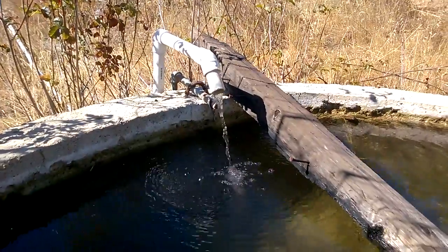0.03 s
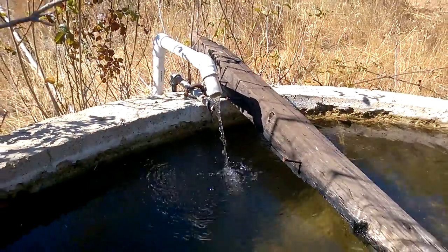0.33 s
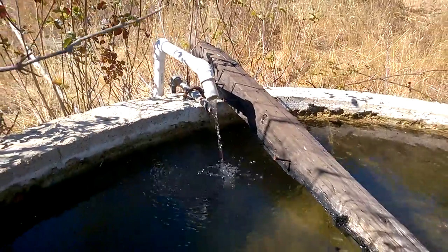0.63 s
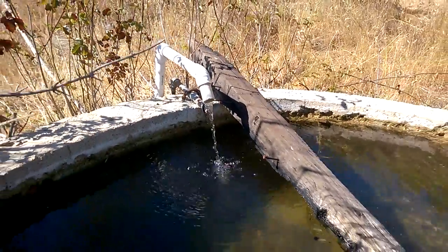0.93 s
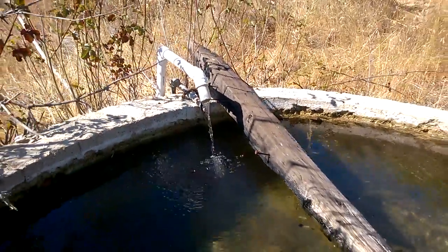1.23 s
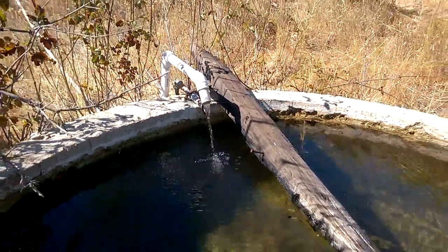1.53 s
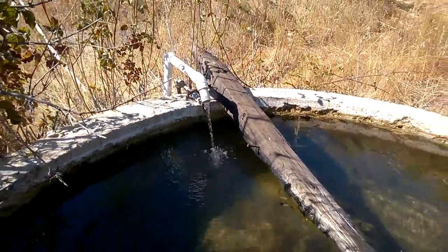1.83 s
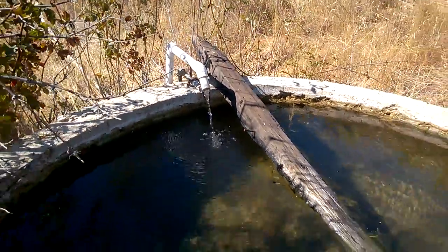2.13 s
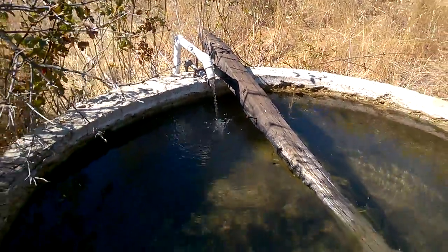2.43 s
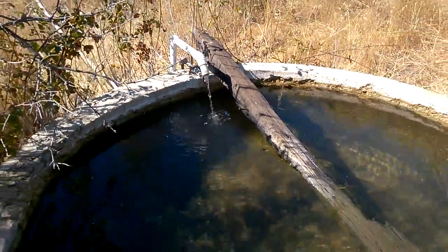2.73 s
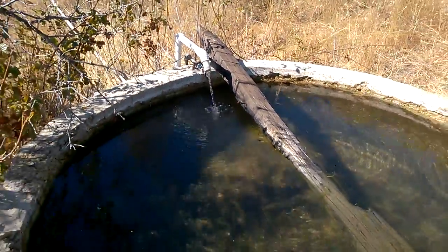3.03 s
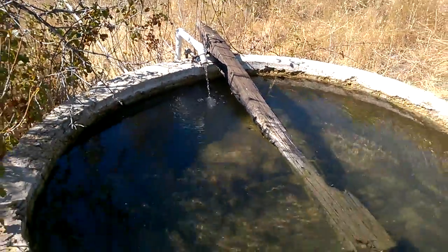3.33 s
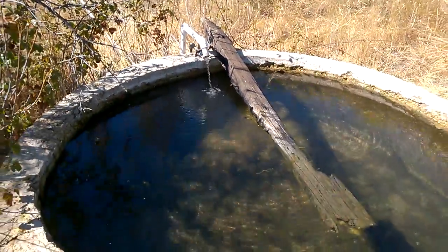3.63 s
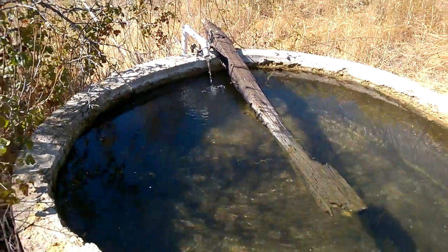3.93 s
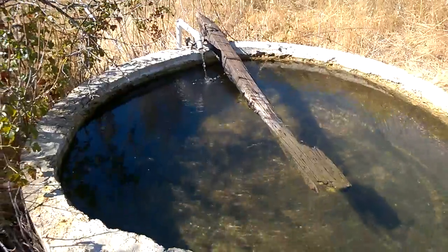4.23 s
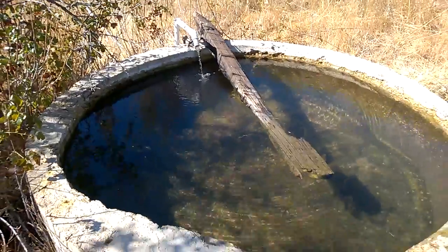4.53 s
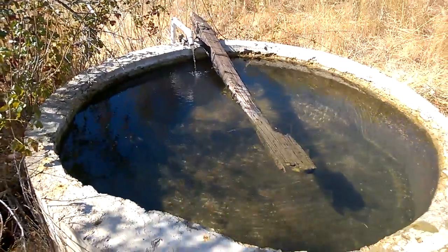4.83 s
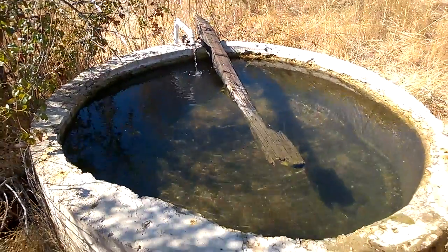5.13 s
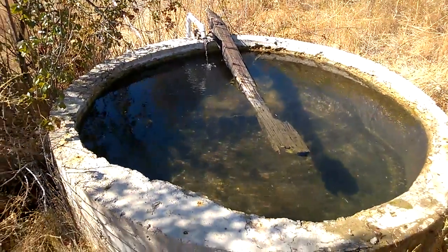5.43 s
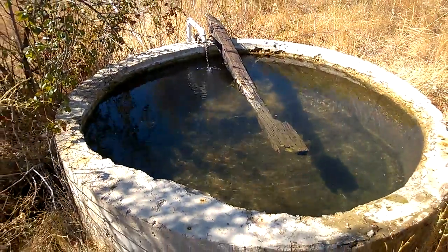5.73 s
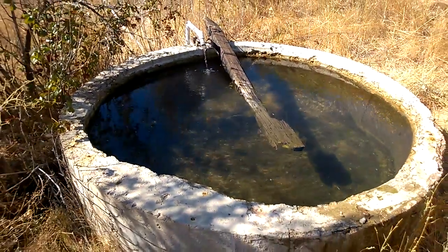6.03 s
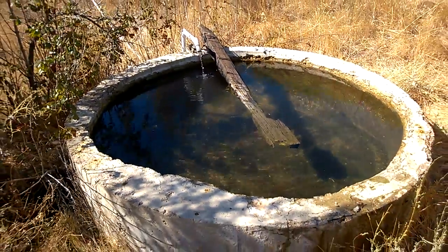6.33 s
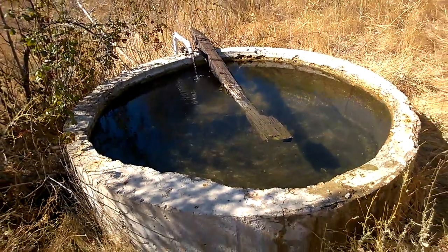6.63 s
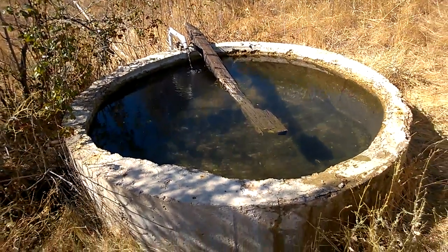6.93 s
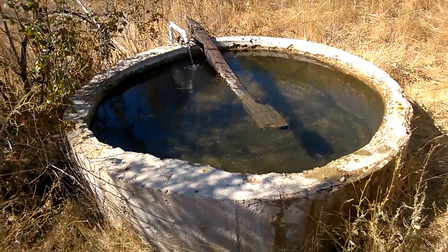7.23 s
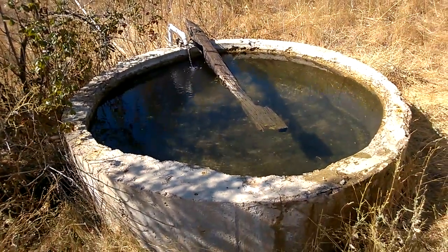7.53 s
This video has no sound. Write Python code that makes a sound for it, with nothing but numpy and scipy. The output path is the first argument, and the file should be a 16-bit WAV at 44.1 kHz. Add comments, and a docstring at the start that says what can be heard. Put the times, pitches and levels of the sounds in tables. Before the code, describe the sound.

Water trickles and plops into a stone trough, then gives way to wind rumble, crunching dry brush and snapping twigs.

```python
"""Water trough and dry brush

A thin stream falls from a pipe into a full stone trough: drops open ringing cavities (plops),
small bubbles pip and larger ones glug upward. The listener backs away through dry brush,
where stalks catch and slip, crunching and hissing, and twigs snap close by.
Gusts buffet the microphone and the hand bumps it a few times."""
import sys
import numpy as np
from scipy import signal
from scipy.fft import rfft, irfft
from scipy.io import wavfile
from scipy.ndimage import uniform_filter1d

SR = 44100
rng = np.random.default_rng(int(sys.argv[2]) if len(sys.argv) > 2 else 0)


def wav_out(sig):
    """Save sig, one row per channel (or a flat mono array), as 16-bit PCM at SR to the path in sys.argv[1]."""
    wavfile.write(sys.argv[1], SR, np.round(np.clip(np.atleast_2d(sig).T, -1, 1) * 32767).astype(np.int16))


N = 334278
T = np.arange(N) / SR


def undb(db):
    return 10 ** (np.asarray(db) / 20)


def unit(x):
    """Scale to rms 1."""
    return x / np.sqrt(np.mean(x ** 2))


def peak(x, db):
    """Scale to a peak level."""
    return x * undb(db) / np.abs(x).max()


def curves(table):
    """Each column of a table as an automation curve over time."""
    s, *columns = np.transpose(table)
    return [np.interp(T, s, c) for c in columns]


def add(out, s, sound):
    """Mix a short sound in at time s."""
    i = int(np.clip(s * SR, 0, N - 1))
    out[i:i + len(sound)] += sound[:N - i]


def colour(x, points):
    """Minimum-phase EQ through points of f/Hz, level/dB."""
    hz, db = np.transpose(points)
    size = 8192
    f = np.maximum(np.arange(size // 2 + 1) * SR / size, 1)
    gain = undb(np.interp(np.log(f), np.log(hz), db))
    cepstrum = irfft(np.log(gain))
    cepstrum[1:size // 2] *= 2
    cepstrum[size // 2 + 1:] = 0
    return signal.fftconvolve(x, irfft(np.exp(rfft(cepstrum))))[:len(x)]


def walk(rate):
    """Random drift with a spread near 1, turning rate times a second."""
    return np.interp(T * rate, np.arange(4096), rng.standard_normal(4096))


def crackle(per_s, spread_db):
    """Random clicks, a few much larger than the rest; rms 1."""
    size = undb(spread_db * np.minimum(rng.exponential(size=N), 4))
    return unit((rng.random(N) < per_s / SR) * size * rng.choice([-1, 1], N))


def noise_burst(t60, samples=SR // 10):
    """White noise with an instant attack, falling 60 dB in t60 seconds."""
    return rng.standard_normal(samples) * np.exp(-np.log(1000) * T[:samples] / t60)


def ring(hz, t60, glide=0, attack=0.00036):
    """A dying sine whose pitch moves by the share glide while it lasts."""
    t = T[:int(t60 * SR) + 2]
    phase = 2 * np.pi * hz * t * (1 + glide * t / t60 / 2)
    return np.sin(phase) * np.exp(-np.log(1000) * t / t60) * (1 - np.exp(-t / attack))


def strike(modes, detune):
    """One hit on modes of f/Hz, level/dB, t60/s, each a little off pitch."""
    out = np.zeros(SR // 4)
    for hz, db, t60 in modes:
        tone = undb(db) * ring(hz * (1 + detune * rng.standard_normal()), t60)[:len(out)]
        out[:len(tone)] += tone
    return out


def patter(per_s, spread_db, cycles, low_hz, high_hz, count):
    """A cloud of brief grains on count pitches, the higher ones stronger for a roughly flat spectrum."""
    out = np.zeros(N)
    for hz in np.geomspace(low_hz, high_hz, count):
        grain = ring(hz, t60=cycles / hz, glide=0.04, attack=0.15 / hz)
        surge = undb(3.55 * walk(18))  # each pitch comes and goes, so the colour keeps shifting
        grains = signal.oaconvolve(crackle(per_s / count, spread_db), grain)[:N]
        out += np.sqrt(hz) * surge * unit(grains)
    return unit(out)


def tail(x, t60, eq):
    """A short scatter of echoes, wet only."""
    echoes = noise_burst(t60, SR // 6) * (T[:SR // 6] > .0015)
    return signal.fftconvolve(x, colour(echoes / np.linalg.norm(echoes), eq))[:N]


# EQ of the ambience bed: f/Hz, level/dB
AIR_EQ = [(12, -43), (20, -4), (60, -16.5), (161, 9), (398, 2), (499, -22), (1040, 5.5), (1590, -12),
          (2110, -5), (2640, -8), (17000, -26)]


def air():
    """The quiet of open country, gently wavering."""
    return unit(colour(rng.standard_normal(N), AIR_EQ)) * undb(-66 + 4.2 * walk(2.84))


# EQ of the babble: f/Hz, level/dB
WATER_EQ = [(180, -56), (300, 2), (425, 5), (528, -11), (593, -12), (994, -9.5), (1080, -14), (1230, -12.5),
            (1690, -21), (2100, -7), (2650, -20.5), (4440, -15), (8220, -28), (10200, -30), (16000, -73)]
# fader ride on the babble and faint drops as the listener backs away: t/s, level/dB
DISTANCE_FADE = [(0, 0), (1.2, -0.5), (1.6, -0.5), (2.4, -2.5), (3.5, -2.5), (5, -0.5), (6, -6),
                 (7.58, -7.5)]
# fader ride on the soft plops, which the rim hides from afar: t/s, level/dB
RIM_SHADE = [(2.5, 12), (5, -11), (7.58, -12)]


def babble():
    """The bed of the pour: countless small bubbles, fine splashes and soft plops."""
    bubbles, soft_plops = np.zeros(N), np.zeros(N)
    for when, pitch, size, life, rise in rng.random((2400, 5)):
        hz = 520 * 13 ** (pitch ** .7)  # small ones outnumber large ones
        bubble = ring(hz, t60=(18 + 36 * life) / hz, glide=0.5 * rise, attack=0.00072)
        add(bubbles, when * N / SR, undb(-14 * size) * bubble)
    for k, (when, size) in enumerate(rng.random((68, 2))):
        add(soft_plops, (k + when) / 9, plop(-44 - 6 * size))  # about nine a second
    splash = patter(per_s=2200, spread_db=3.5, cycles=14, low_hz=600, high_hz=13000, count=16)
    splash *= undb(7.9 * walk(40))
    water = undb(-51.5) * unit(colour(bubbles, WATER_EQ)) + undb(-56) * unit(colour(splash, WATER_EQ))
    water += soft_plops * undb(curves(RIM_SHADE)[0])
    return water * undb(curves(DISTANCE_FADE)[0])


def spurts(rise_s=.003, fall_s=0.026, spurt_db=-1, lull_db=-5):
    """Gain of the babble: splashing gathers behind each big drop and sinks to a lull between them."""
    burst = np.zeros(N)
    for s, *_ in PLOPS + PIPS + SPRAY:
        near = np.abs(T - s) < .2
        age = T[near] - s
        width = np.where(age < 0, rise_s, fall_s)
        burst[near] = np.maximum(burst[near], np.exp(-(age / width) ** 2))
    return undb(lull_db + (spurt_db - lull_db) * burst)


def sprinkle(sound, db, hz, scatter, count, range_db=10.5):
    """Faint drops at loosely even moments, scattered in pitch and size, fading with distance."""
    out = np.zeros(N)
    for k, (when, size, pitch) in enumerate(rng.random((count, 3))):
        drop_hz = hz * np.exp(2 * scatter * (2 * pitch - 1))
        add(out, (k + when) / count * N / SR, sound(db - range_db * size, drop_hz))
    return out * undb(curves(DISTANCE_FADE)[0])


def play(cues, sound):
    """Trigger a sound at the time of each cue, with the rest of the row as its settings."""
    out = np.zeros(N)
    for s, *settings in cues:
        add(out, s, sound(*settings))
    return out


# foreground small bubbles: t/s, peak level/dB, f/Hz
PIPS = [(0.017, -40.5, 2240), (0.073, -38, 2270), (0.085, -36, 2020), (0.114, -40, 2100),
        (0.19, -40.5, 2330), (0.428, -38, 2030), (0.656, -37, 1990), (0.704, -41, 2190),
        (0.853, -36.5, 1520), (0.918, -35.5, 2000), (0.942, -35, 2070), (1.072, -37.5, 2160),
        (1.104, -32.5, 2090), (1.191, -32, 2120), (1.234, -41.5, 2080), (1.472, -39.5, 2020),
        (6.146, -35, 2030), (6.377, -35, 1930), (6.45, -43, 1760), (6.73, -44, 2050), (6.798, -45, 2300),
        (6.903, -42.5, 1990), (7.247, -40.5, 1940), (7.488, -47, 1870)]


def pip(db, hz):
    """A small bubble rings and rises a little."""
    return peak(ring(hz, t60=0.016, glide=0.013, attack=0.00053), db)


# rising bubbles: t/s, level/dB, start f/Hz, end f/Hz, length/s
GLUGS = [(0.024, -49, 610, 1150, 0.026), (0.202, -50, 1080, 1390, 0.022), (0.353, -46, 940, 1050, 0.017),
         (0.426, -47, 1090, 1470, 0.013), (0.758, -47, 520, 1030, 0.043), (0.863, -38, 804, 1570, 0.014),
         (0.91, -35, 570, 1460, 0.0103), (0.987, -47, 870, 1480, 0.057), (1.141, -44, 717, 1040, 0.033),
         (1.278, -48, 836, 1040, 0.026), (2.33, -48, 720, 850, .05), (2.541, -50, 774, 940, .04)]


def glug(db, start_hz, end_hz, length):
    """A bubble whose pitch climbs, wobbling, as it nears the surface."""
    age = np.linspace(0, 1, int(length * SR))
    wobble = np.interp(age, np.linspace(0, 1, 7), rng.standard_normal(7))
    hz = start_hz * (end_hz / start_hz) ** age * (1 + .04 * wobble)
    envelope = np.sqrt(np.abs(np.sin(np.pi * age))) * undb(db + 3 * wobble[::-1])
    return np.sin(2 * np.pi * np.cumsum(hz) / SR) * envelope


# foreground drops: t/s, level/dB
PLOPS = [(0.026, -34.5), (0.157, -35.5), (0.213, -36.5), (0.235, -34), (0.25, -28), (0.304, -40),
         (0.321, -44), (0.41, -33.5), (0.534, -36), (0.583, -31.5), (0.598, -37.5), (0.672, -48),
         (0.8, -47), (0.886, -30), (0.922, -35), (0.956, -38.5), (1.087, -34), (1.258, -42), (1.415, -38),
         (1.614, -44.5), (1.719, -44), (1.822, -40), (1.926, -42), (2.079, -36.5), (2.112, -36.5),
         (2.217, -43), (2.468, -41)]
# modes of the cavity a drop opens: f/Hz, level/dB, t60/s
CAVITY_MODES = [(421.7, -4, 0.12), (648, -9, 0.073), (796, -4, 0.033), (1270, -0.5, 0.014),
                (2140, -6, 0.013)]


def plop(db):
    """A drop opens a ringing cavity and drags a flurry of small bubbles under."""
    modes = []
    for hz, level, t60 in CAVITY_MODES:
        stray = .06 * (hz > 500) * rng.standard_normal()  # the upper modes vary most
        modes.append((hz * (1 + stray), level + 2.2 * rng.standard_normal(), t60))
    out = peak(strike(modes, detune=.025), 0)
    for late, pitch, size in rng.random((8, 3)):
        hz = 1100 * 5.5 ** pitch
        bubble = ring(hz, t60=28 / hz, glide=0.17, attack=0.00065)
        add(out, .04 * late, undb(-8.5 - 28 * size - 7 * pitch) * bubble)
    return out * undb(db)


# foreground droplets: t/s, level/dB, f/Hz
SPRAY = [(0.246, -43, 3130), (0.306, -41, 5520), (0.409, -47, 3040), (0.499, -38.5, 3540),
         (0.924, -44, 3250), (1.073, -47, 3770), (1.247, -41.5, 3760), (1.615, -44.5, 4140),
         (1.658, -44.5, 4470), (2.149, -42, 4300), (2.295, -44, 4320), (2.493, -43.5, 4100),
         (2.665, -34.5, 4840), (3.455, -38, 4540), (6.269, -49.5, 3900), (6.463, -47, 3430),
         (7.22, -37.5, 4000), (7.323, -49.5, 4670)]


def droplet(db, hz):
    """A droplet of spray splats, then leaves a tiny bubble."""
    splat = rng.standard_normal(SR // 25) * np.exp(-T[:SR // 25] / 0.0039)
    splat_eq = [(1500, -17.5), (3500, 1.5), (6000, -6.5), (8000, -14.5), (11000, -16), (16000, -23.5)]
    out = peak(colour(splat, splat_eq), db=1)
    add(out, 0.001, peak(ring(hz, t60=0.01, glide=0.11, attack=0.00045), 0))
    return out * undb(db)


def stream():
    """The falling water: foreground drops over spurting babble, faint pips and faint spray."""
    faint_pips = sprinkle(pip, db=-46.5, hz=2170, scatter=0.06, count=60)
    faint_spray = sprinkle(droplet, db=-44.5, hz=4035, scatter=0.215, count=130)
    drops = play(PLOPS, plop) + play(PIPS, pip) + play(GLUGS, glug) + play(SPRAY, droplet)
    return drops + babble() * spurts() + faint_pips + faint_spray


def trough(water):
    """The stone rim throws back short echoes, and a hollow note hums along under the pour."""
    hollow = signal.fftconvolve(water, ring(hz=425.3, t60=0.14))[:N]
    hollow *= np.std(water) / np.std(hollow)
    echoes = tail(water, t60=0.046, eq=[(400, -9), (1000, -3), (2500, -5.5), (10000, -7)])
    return water + undb(-0.5) * echoes + undb(-14) * hollow


# gusts on the microphone: t/s, hold/s, level/dB
GUSTS = [(0.205, 0.037, -52), (0.44, .015, -54), (1.452, .015, -54), (2.27, 0.022, -54),
         (2.475, 0.085, -32), (2.599, 0.052, -28), (2.66, .18, -36.5), (2.893, 0.037, -22.5),
         (2.962, 0.091, -19), (3.097, 0.013, -28.5), (3.166, 0.015, -14.5), (3.191, 0.032, -25),
         (3.298, 0.0075, -22.5), (3.358, 0.013, -32.5), (3.452, 0.24, -50.5), (3.713, 0.029, -41),
         (3.794, .025, -44), (4.365, 0.043, -43.5), (4.443, 0.09, -53.5), (4.685, 0.022, -50),
         (4.914, 0.19, -50), (5.542, 0.088, -54.5), (6.947, .02, -37.5), (7.049, 0.091, -43.5),
         (7.173, 0.024, -36), (7.223, 0.051, -32), (7.285, .16, -48), (7.465, 0.036, -43),
         (7.533, 0.058, -37)]


def gusting(attack_db_per_s=900, release_db_per_s=523):
    """Wind strength in dB: each gust leaps up, holds and drops back into the breeze."""
    db = -66.5 + 5.5 * walk(14)  # the breeze
    for s, hold, top_db in GUSTS:
        below = np.maximum(attack_db_per_s * (s - T), release_db_per_s * (T - s - hold))
        db = np.maximum(db, top_db - np.maximum(below, 0))
    return db


# EQ of the eddies, ahead of their levelling: f/Hz, level/dB
EDDY_EQ = [(11, -63), (18, 13.5), (59, 0), (118, -10.5), (188, -22), (220, -28.5), (254, -17), (365, -29.5),
           (400, -34), (520, -73), (880, -120)]


def wind():
    """Eddies on the microphone; the harder the gust, the higher its rumble reaches."""
    gust_db = gusting()
    eddies = colour(rng.standard_normal(N), EDDY_EQ)
    eddies /= np.sqrt(uniform_filter1d(eddies ** 2, SR // 18))  # levelled: the gusts set the dynamics
    rumble = unit(colour(eddies, [(25, -14), (50, 1.5), (85, 3), (120, -2), (250, -8)]))
    puffs = crackle(per_s=400, spread_db=3)
    flutter_eq = [(70, -17), (130, 14.5), (200, -3.5), (300, -14.5), (450, -19), (1000, -60)]
    flutter = unit(colour(puffs, flutter_eq))
    return rumble * undb(gust_db) + flutter * undb(-36.5 + 2 * (gust_db + 25))


# tiny bright clicks, from splatting drops at first and dry stems later: t/s, peak level/dB
TICKS = [(0.2492, -41), (0.308, -39), (0.9223, -37), (2.6303, -25), (3.1735, -20.5), (3.4284, -27),
         (4.402, -20), (4.446, -27), (4.6922, -47), (4.853, -26), (4.88, -23), (5.013, -26.5),
         (5.1668, -29), (5.249, -28), (5.8176, -13.5), (6.2024, -43)]


def tick(db):
    """A tiny, bright click: a drop splats or a dry stem gives."""
    tick_eq = [(3000, -6.5), (6000, -7), (8000, 3), (12000, 9), (14000, -8), (17000, -36)]
    return peak(colour(noise_burst(t60=0.0021), tick_eq), db)


# handling bumps: t/s, peak level/dB, f/Hz, t60/s
BUMPS = [(0.448, -18.5, 260, 0.0074), (3.747, -33, 485, 0.077), (5.551, -36, 210, 0.012),
         (6.321, -36.5, 352, 0.021), (6.37, -27, 349, 0.026), (6.546, -24.5, 353, 0.024),
         (6.689, -31, 327, 0.022)]


def bump(db, hz, t60):
    """The hand knocks softly on the housing: a dull note that sags in pitch."""
    return peak(ring(hz, t60, glide=-0.36, attack=0.0015), db)


# light rustle of the moving listener: t/s, crunch/dB, scrape/dB, hiss/dB
RUSTLE = [(1.8, -69, -77, -97), (2.45, -56.5, -55, -77), (2.85, -58, -56.5, -50.5),
          (3.5, -46.5, -56.5, -65), (4.3, -69, -59.5, -59), (4.8, -64, -62.5, -67),
          (5.6, -56.5, -58, -58.5), (6, -59.5, -59.5, -73), (6.8, -66.5, -61.5, -91),
          (7.1, -83, -64.5, -88), (7.58, -74, -70, -77)]
# pushes through the brush: crest t/s, length/s, crunch/dB, scrape/dB, hiss/dB, swish/dB
PUSHES = [(1.98, 0.14, -53.5, -60, -71.5, -75.5), (2.279, 0.046, -50.5, -55, -63.5, -70),
          (2.356, .13, -55, -56, -71, -85), (2.536, 0.033, -55, -68, -57, -60),
          (2.62, 0.055, -46.5, -50, -50.5, -59), (2.708, 0.077, -46, -68, -65, -80),
          (2.858, 0.15, -45, -50, -67, -78), (2.968, 0.19, -59, -49.5, -50, -80),
          (3.116, 0.12, -50, -47.5, -44.5, -56), (3.28, 0.21, -46, -50.5, -47.5, -84),
          (3.435, 0.065, -65, -52, -45, -59), (3.574, 0.058, -53, -44, -42, -42),
          (3.655, 0.2, -44, -50.5, -48, -51), (3.871, 0.084, -46, -44.5, -43.5, -45),
          (3.944, 0.088, -51, -50, -45.5, -54), (4.077, 0.076, -48, -43, -43.5, -53),
          (4.157, 0.11, -46.5, -55.5, -52.5, -70), (4.41, 0.2, -43.5, -50, -48.5, -60),
          (4.512, 0.13, -48.5, -50.5, -42.5, -42.5), (4.696, 0.081, -41, -50, -50.5, -60),
          (4.899, 0.1, -43, -45.5, -44, -43.5), (4.973, 0.083, -42, -59, -46.5, -66),
          (5.166, .1, -44.5, -55.5, -50.5, -70), (5.317, .1, -46.5, -40.5, -40, -44),
          (5.43, 0.088, -46.5, -49.5, -49, -71), (5.789, 0.092, -47.5, -46.5, -48, -54),
          (5.883, 0.079, -76, -58, -59, -79), (6.16, 0.12, -55.5, -66, -68.5, -76),
          (6.38, 0.16, -54, -54.5, -75, -85), (6.553, 0.09, -50, -52.5, -73, -82),
          (6.675, 0.13, -58, -54.5, -86, -78), (6.84, 0.066, -62, -57, -96, -93),
          (7.096, 0.033, -79, -55.5, -56, -76), (7.237, 0.053, -57, -75, -68, -80)]


def pushing(rise_share=0.42, edge_db=6.5, roundness=1.85):
    """Gains of crunch, scrape, hiss and swish: each push swells and dies away over the light rustle."""
    power = np.vstack([undb(curves(RUSTLE)) ** 2, np.zeros(N)])
    for s, length, *levels_db in PUSHES:
        near = np.abs(T - s) < 4 * length
        age = (T[near] - s) / length
        from_crest = np.where(age < 0, -age / rise_share, age / (1 - rise_share))
        swell = undb(-edge_db * from_crest ** roundness)  # roundness 1 is pointed, 2 a bell
        envelopes = [swell, swell, swell, swell ** 2]  # the swish hugs the crest
        power[:, near] += (undb(levels_db)[:, None] * envelopes) ** 2
    return np.sqrt(power)


# EQs of the brush layers: f/Hz, level/dB
CRUNCH_EQ = [(110, -25.5), (180, -5), (303, -1.5), (357, -1.5), (454, -1), (540, -4.5), (972, 0.5),
             (1630, -6), (1800, -7), (2340, -23), (3960, -120)]  # coarse body
SCRAPE_EQ = [(880, -33), (1500, -1.5), (2140, 0.5), (2990, -3), (3400, -3), (4120, -3.5), (5440, -15),
             (6000, -25), (7800, -37), (13200, -120)]  # grainy mids
RASP_EQ = [(760, -52), (1300, -12), (1530, -11.5), (1960, 2.5), (2330, -7), (2700, -6.5), (3200, -14),
           (3490, -11), (4070, -10.5), (4400, -21), (5390, -26), (5870, -43), (7000, -35), (9100, -52),
           (15400, -120)]  # narrow, hollow mids
HISS_EQ = [(3240, -59), (5500, -13), (6190, -7.5), (6900, -2), (8160, 1), (10200, 2.5), (11700, 1.5),
           (12400, 2), (14200, -12), (15000, -42)]  # soft top
SWISH_EQ = [(3240, -48), (5500, -18), (6690, -3), (7960, -25), (11300, 4), (12400, 0), (14100, 2),
            (16600, 0), (17300, -12)]  # hard top
STEM_EQ = [(400, -7), (1200, 9.5), (3800, 6), (5500, -15), (8000, -7), (12500, -12), (15000, -21)]  # tiny stems cracking


def brush():
    """Dry plants: coarse crunching, a finer scrape, and the dense hiss of sliding stalks."""
    crunch_gain, scrape_gain, hiss_gain, swish_gain = pushing()
    grip = undb(2 * walk(220))  # stalks catch and slip, so grains come in quick clusters
    coarse = patter(per_s=2000, spread_db=2, cycles=7.1, low_hz=224, high_hz=1700, count=8) * grip
    crunch = unit(colour(coarse, CRUNCH_EQ)) * crunch_gain
    grains = patter(per_s=4500, spread_db=4, cycles=7, low_hz=1400, high_hz=6500, count=10) * grip
    slow_steps = np.interp(T, [5.4, 5.7, 6.9, 6.95], [0, 1, 1, 0])  # crossfade from scrape to rasp
    scrape = unit(colour(grains, SCRAPE_EQ)) * scrape_gain * (1 - slow_steps)
    rasp = unit(colour(grains, RASP_EQ)) * scrape_gain * slow_steps
    fine = patter(per_s=14000, spread_db=3.5, cycles=9, low_hz=5000, high_hz=15500, count=10) * grip
    hiss = unit(colour(fine, HISS_EQ)) * hiss_gain
    sharp = crackle(per_s=12000, spread_db=3.5) * grip
    swish = unit(colour(sharp, SWISH_EQ)) * swish_gain
    cracks = crackle(per_s=70, spread_db=2)
    stems = unit(colour(cracks, STEM_EQ)) * undb(-12) * scrape_gain * (1 - slow_steps)
    return crunch + scrape + rasp + hiss + swish + stems


# twig snaps: t/s, level/dB, brightness/dB
SNAPS = [(3.375, -20, -14), (3.579, -18, -10.5), (3.724, -33, -12), (4.07, -27, -4), (4.083, -25.5, -3),
         (4.329, -29.5, -27), (4.403, -18.5, -19), (4.578, -30.5, -24), (4.693, -5, 0.5), (4.853, -33, 12),
         (4.911, -41, 13), (4.987, -31, -28), (5.013, -30, -17), (5.167, -32, 5), (5.311, -28, 3),
         (5.497, -29, -33), (5.817, -28, -2.5), (6.146, -38, -1), (6.379, -37.5, 2)]
# modes of a twig: f/Hz, level/dB, t60/s
TWIG_MODES = [(426, -23, 0.018), (1072, 2, 0.0073), (1330, -13.5, 0.017), (2270, -9.5, 0.014),
              (2660, 12.5, 0.003), (3170, -8.5, 0.013)]


def twigs():
    """Twigs break with a dry crack and a short woody ring that the ground scatters."""
    crack_eq = [(300, -4), (3500, 0), (4800, -7), (7500, 0), (12000, -6), (16000, -14)]
    ground_eq = [(300, -1), (900, -11), (2700, -21), (5000, 1), (10000, -5)]
    out = np.zeros(N)
    for s, db, bright_db in SNAPS:
        modes = [(hz, level + bright_db * (hz > 1800), t60) for hz, level, t60 in TWIG_MODES]
        add(out, s, peak(strike(modes, detune=0.0088), db))
        add(out, s, peak(colour(noise_burst(t60=0.026), crack_eq), db - 14))
    return out + undb(-3.5) * tail(out, t60=0.075, eq=ground_eq)


def scene():
    """The mono mix: water, dry plants, ticks, handling, wind and ambience."""
    water = trough(stream())
    plants = brush() + twigs()
    return (water + plants + play(TICKS, tick) + play(BUMPS, bump) + wind() + air())[None]


def record(dry):
    """Faint microphone hiss, then a steep high cut."""
    hiss = undb(-78.5) * rng.standard_normal(N)
    high_cut = signal.ellip(10, .2, 70, 17300, fs=SR, output="sos")
    return signal.sosfilt(high_cut, dry + hiss)


dry = scene()
out = record(dry)
wav_out(out)
```